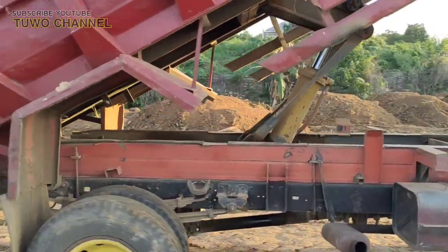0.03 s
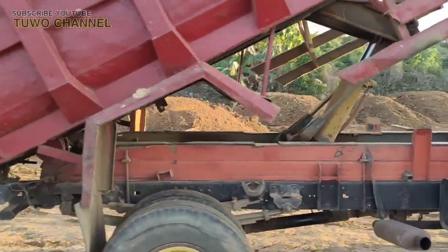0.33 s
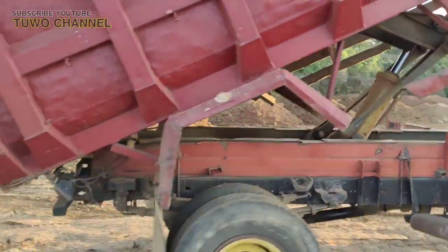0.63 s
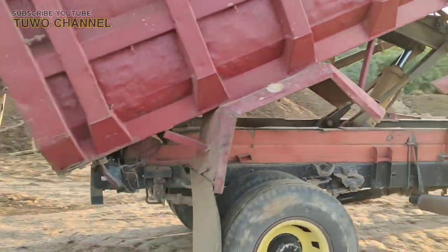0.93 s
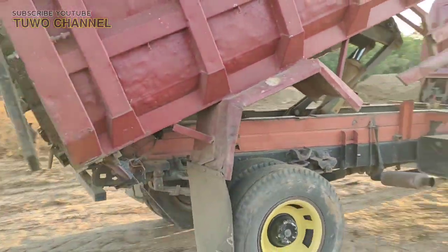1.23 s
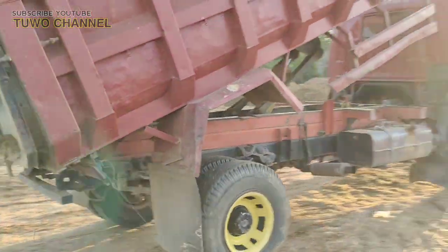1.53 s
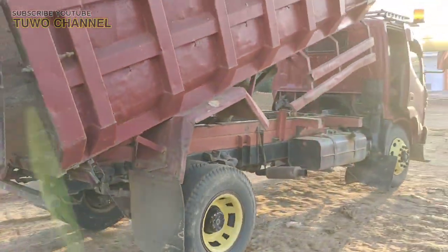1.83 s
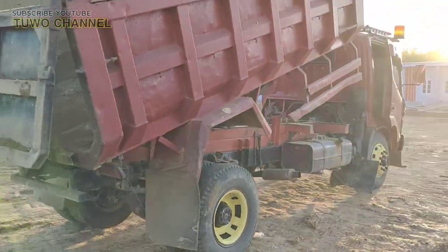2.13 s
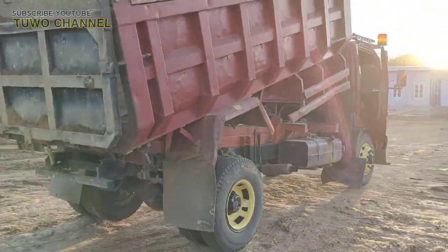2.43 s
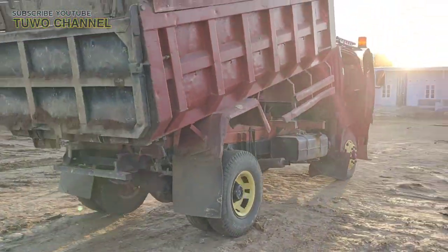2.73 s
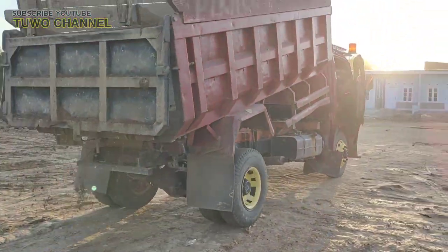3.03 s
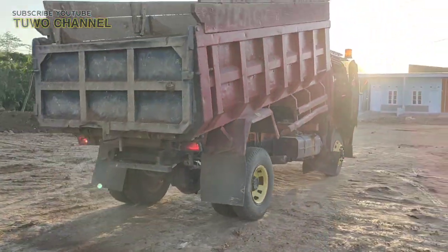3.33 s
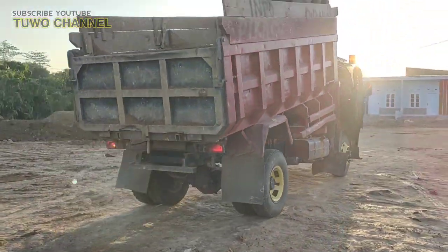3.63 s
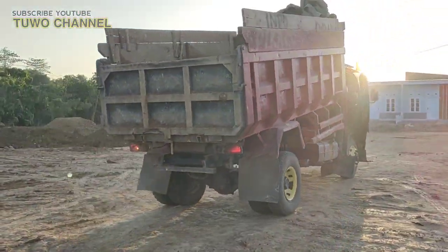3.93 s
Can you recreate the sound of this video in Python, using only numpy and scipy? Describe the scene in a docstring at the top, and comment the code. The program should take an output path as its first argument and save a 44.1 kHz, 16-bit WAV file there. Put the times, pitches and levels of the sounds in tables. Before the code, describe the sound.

A dump truck's diesel engine thuds a few metres away outdoors, slowing and receding from about 2 seconds. Its steel tailgate slams loudly at 0.1, 1.4 and 2.6 seconds, then more softly at 3.7, each time rattling and making the bed boom. A faint hydraulic whine sinks until 2.5 seconds. Sharp metal clanks follow between 2.5 and 3.7 seconds. Chassis knocks, brief squeaks and light scrapes are scattered throughout.

```python
"""Dump truck lowering its bed

A diesel truck pulls away over a dirt lot as its steel bed comes down with a hydraulic whine. The engine
thuds, slows and recedes. The swinging tailgate slams four times and makes the bed boom; its catches
clank, the chassis knocks and pivots squeak. Taken in the open from a few metres, on a closely spaced
pair of microphones that overload on the slams."""
import sys
import numpy as np
from scipy import signal
from scipy.fft import rfft, irfft, next_fast_len
from scipy.io import wavfile
from scipy.ndimage import map_coordinates

SR = 44100
rng = np.random.default_rng(int(sys.argv[2]) if len(sys.argv) > 2 else 0)


def to_wav(sig):
    """Store sig (one row per channel, or 1-D mono) as 16-bit WAV at the path in sys.argv[1].

    Samples outside -1..1 are clipped; the rate is SR.
    """
    pcm = np.clip(np.atleast_2d(sig), -1, 1) * 32767
    pcm = np.round(pcm).astype(np.int16)
    wavfile.write(sys.argv[1], SR, pcm.T)  # frames by channels


N = 176400

# tailgate slams: t/s, boom/dB, clash/dB, treble/dB, boom delay/s, stretch of chatter and boom/ratio
SLAMS = [(.093, -4, -10, -22, 0.027, 0.86), (1.425, -4, -10, -29.5, .018, 0.93),
         (2.636, -5, -8.5, -24.5, .018, 1.3), (3.674, -10.5, -22, -46, 0.0053, 0.81)]
# the gate's landing and rebounds: t after the slam/s (before stretch), level/dB
CHATTER = [(0, 7), (0.028, -5.5), (.06, -9.5), (0.111, -5.5)]
# spectra of the gate's first contact, its clash and the bed's boom: f/Hz, level/dB
IMPACT_SPECTRUM = [(300, -25), (900, -2), (1700, -9), (2600, -10), (3800, 6), (4900, 2), (5800, -38),
                   (7500, -19), (9000, -8), (15000, -21)]
CLASH_SPECTRUM = [(100, -47), (300, 10.5), (600, -4.5), (850, 9.5), (1350, 1.5), (1700, 3), (2100, -3.5),
                  (2600, -1), (3100, -11.5), (4300, -9.5), (5600, -43), (9000, -64)]
BOOM_SPECTRUM = [(25, -57), (60, -11), (100, 1.5), (135, 4.5), (230, 0.5), (340, 10), (430, -7.5),
                 (590, -10), (800, -5), (1100, -6), (1500, -56), (3000, -52.5)]
# decay of the boom: f/Hz, t60/s (before stretch)
BOOM_DECAY = [(100, 1), (220, 1), (350, 0.53), (800, 0.54), (2000, 0.16)]
# modes of the bed panels: f/Hz, level/dB, t60/s
PANEL_MODES = [(130.4, 4, 0.4), (202.8, -2, 1), (233.5, -2, 1), (303.7, -5.5, 0.33), (345.4, -2.5, 1),
               (530.4, -11, 0.59), (766, -11.5, 0.5), (820, 0, 0.46), (875, 0, 0.13), (898, -19, 0.47),
               (1100, -4.5, 0.39), (1212, -11, 0.53), (1607, 1, 0.22), (1802, -12, .35)]
# dull bumps of the bed: t/s, level/dB, f/Hz, t60/s
BED_BUMPS = [(0.0, -5, 240.4, 0.39), (.124, -24, 850, 0.16), (.134, -7.5, 517, 0.28),
             (0.847, -17.5, 350, 0.085), (1.254, -8.5, 365, 0.14), (1.281, -14.5, 382, 0.37),
             (1.551, -6.5, 190, 0.32), (2.484, -16.5, 460, 0.38), (2.791, -7, 224, 0.43),
             (3.66, -17, 385, 0.18), (3.681, -8, 383, 0.16), (3.798, -10, 209, 0.22)]
# clanks of the catches, with the gate's rebound at 2.743 s voiced the same way: t/s, crack/dB, treble/dB,
# ring/dB
CLANKS = [(2.483, -8, -19.5, -53), (2.692, -12.5, -17, -32.5), (2.743, -12, -27, -28),
          (3.053, -2, -8, -24.5), (3.723, -5, -7.5, -23)]
# a catch's crack and its ringing modes: f/Hz, level/dB
CRACK_SPECTRUM = [(200, -32), (500, -3.5), (900, 15), (1250, 2), (1700, -2), (2500, 4), (3000, 2.5),
                  (3500, -1.5), (4100, -8.5), (4900, -9.5), (5800, -22), (9000, -35)]
CATCH_MODES = [(2143, -7), (2476, -2), (2700, 0.5), (3068, -6), (4390, -2), (4511, -4), (6222, -7.5),
               (7654, 3.5), (8053, -8), (9608, -6), (10970, -15.5), (12240, -16), (14100, -19), (14340, -8)]
# engine speed: t/s, firing rate/Hz
FIRING_RATE = [(0, 30.63), (1.1, 30.63), (1.6, 30.4), (2.0, 29.3), (2.15, 24.5), (2.5, 24), (3.0, 26.4),
               (4, 26.5)]
# engine loudness as the truck moves off: t/s, exhaust/dB, clatter/dB, hiss/dB
ENGINE_LEVELS = [(0, -16.5, -19, -31.5), (.35, -15.5, -22.5, -33), (.7, -19, -24, -34.5),
                 (1.08, -17, -24, -33.5), (1.25, -19.5, -25, -39.5), (1.7, -21, -24.5, -36.5),
                 (2.0, -25, -27, -40.5), (2.25, -27.5, -27.5, -42), (2.5, -29.5, -34.5, -42),
                 (3.0, -27.5, -32, -42.5), (3.4, -33.5, -32.5, -44.5), (3.6, -32.5, -33.5, -45.5),
                 (4, -26.5, -34.5, -50)]
# engine spectra, the hiss also serving for steel and grit: f/Hz, level/dB
EXHAUST_SPECTRUM = [(20, -36), (40, -41), (60, -12), (90, -3), (122, 5.5), (155, 2), (210, -16),
                    (300, -15.5), (420, -36), (800, -45), (2000, -73)]
RUMBLE_SPECTRUM = [(20, -30), (40, -42), (70, -2), (120, -1), (200, -2.5), (370, -6.5), (520, -14),
                   (1000, -44), (3000, -80)]
CLATTER_SPECTRUM = [(150, -12), (400, -4), (600, -5), (950, 3), (1400, 0), (1700, 0), (2400, -4.5),
                    (3000, -8), (4000, -14.5), (5200, -24.5), (9000, -27.5)]
HISS_SPECTRUM = [(2000, 1.5), (4000, -2), (5700, -4.5), (7500, 3.5), (8600, -6.5), (11500, -13),
                 (14500, -17), (16000, -31)]
# chassis knocks: t/s, thud/dB, tick/dB
KNOCKS = [(0.262, -19, -5), (0.33, -9.5, -14), (.36, -34, -14), (0.393, -12, -3.5), (.523, -31, -16),
          (.653, -10.5, -10), (0.755, -20, -13), (0.785, -22, -22), (1.015, -25, -25), (1.896, -14, -32),
          (1.996, -12, -35), (3.247, -33, -22), (3.289, -12.5, -13.5), (3.445, -22, -24.5),
          (3.503, -18, -42), (3.554, -30, -40), (3.612, -29, -26), (3.909, -13, -12)]
# the low and high parts of a knock: f/Hz, level/dB
THUD_SPECTRUM = [(20, -36), (50, -17), (90, 6), (130, -3), (220, -11.5), (500, -27.5), (2000, -70)]
TICK_SPECTRUM = [(500, -12), (1600, -4.5), (2000, 0.5), (2300, 14.5), (2700, -14), (3600, -7), (6000, -40)]
# pivot squeaks: t/s, length/s, f/Hz, level/dB
SQUEAKS = [(.49, 0.073, 1690, -26), (.52, 0.095, 1920, -26.5), (.61, 0.03, 3370, -25.5),
           (0.991, .045, 1680, -25), (1.42, 0.034, 4860, -26), (1.5, .03, 4900, -27.5),
           (1.578, 0.03, 3396, -26.5), (2.05, 0.039, 5250, -39), (2.335, 0.039, 3490, -31.5),
           (2.985, 0.082, 2280, -24.5), (2.985, 0.076, 6980, -37.5), (3.15, 0.047, 3280, -34)]
# gritty scrapes: t/s, length/s, level/dB
SCRAPES = [(1.723, 0.13, -36), (2.022, 0.073, -36.5), (2.176, 0.049, -32.5), (2.589, 0.12, -28.5),
           (2.977, 0.046, -32.5), (3.111, 0.064, -29), (3.209, 0.034, -36), (3.433, 0.067, -33.5),
           (3.771, 0.035, -37)]
# hydraulic whine: t/s, f/Hz, level/dB
WHINE = [(.3, 4600, -44), (.6, 4354, -41), (1.0, 3970, -41.5), (1.3, 3790, -40.5), (1.7, 3590, -48),
         (2.05, 3510, -40), (2.45, 3540, -41), (2.6, 3480, -71)]
# bearings from the microphones as the truck moves past: t/s, lead of the right microphone/ms
GATE_BEARING = [(0, 0.4), (4, 0.335)]
BED_BEARING = [(0, 0.24), (4, 0.13)]
ENGINE_BEARING = [(0, -0.074), (.9, -0.071), (1.8, 0.14), (4, 0.14)]
# likeness of the sound at the two microphones: f/Hz, coherence/ratio
MIC_COHERENCE = [(60, 0.97), (250, 1), (500, 0.93), (1000, 0.55), (4000, 0.28), (12000, 0.18)]
# mismatch of the pair: f/Hz, left minus right/dB
MIC_BALANCE = [(60, -1.0), (92, -1.5), (140, -1.0), (210, -1.5), (330, -0.5), (500, 3), (760, -7.5),
               (1160, 3.5), (1780, -1.5), (2710, 3.5), (4140, -3.5), (6320, 3), (9660, -3), (14800, 3.5)]

STEEL_PEAKS_DB = 3  # depth of the crowded resonances in struck steel
IMPACT_DB, IMPACT_T60, CLASH_T60 = -3.5, 0.037, 0.23  # level relative to the clash
PANEL_DB = -7  # relative to the boom
CRACK_T60, CRACK_TAIL_T60, CRACK_TAIL_DB = 0.071, 0.55, -13
CATCH_T60, CATCH_SEATS_S, CATCH_DAMP_S = .42, .09, .02
FIRING_OFFSET_S, FIRING_JITTER_S, FIRING_SCATTER_DB = 0.001095, 0.00056, 2.56
RUMBLE_DB, RATTLE_DB = -2.5, -10  # relative to the exhaust thumps and the clatter
RATTLE_HZ, RATTLE_SPREAD_OCT, RATTLE_T60, RATTLE_SCATTER_DB = 1576, .55, 0.065, 3
WHINE_WIDTH_HZ = 190
MIC_CEILING, MIC_TOP_HZ = 1, 15400


def tailgate():
    """Steel hits steel hard, then chatters as the gate rebounds."""
    out = np.zeros((2, N))
    for s, _, clash_db, treble_db, _, stretch in SLAMS:
        impact = steel(IMPACT_SPECTRUM) * decay(IMPACT_T60, attack_s=0.0014)
        add(out, s, amp(clash_db + IMPACT_DB) * impact)
        for after_s, db in CHATTER:
            clash = amp(clash_db) * steel(CLASH_SPECTRUM) * decay(CLASH_T60, attack_s=0.0019)
            treble = amp(treble_db) * noise(HISS_SPECTRUM) * decay(t60=0.24, attack_s=0.00082)
            add(out, s + after_s * stretch, amp(db) * (clash + treble))
    return out


def bed_boom():
    """The empty bed booms and its panels ring just after each slam."""
    out = np.zeros((2, N))
    for s, boom_db, _, _, delay_s, stretch in SLAMS:
        boom = wash(BOOM_SPECTRUM, [(hz, t60 * stretch) for hz, t60 in BOOM_DECAY], attack_s=0.016)
        panels = amp(PANEL_DB) * ring(PANEL_MODES, attack_s=0.0017, drift_rad=0.52)
        add(out, s + delay_s, amp(boom_db) * (boom + panels))
    return out


def catches():
    """A hard crack, a short wash from the gate and a high steel ring, choked as the catch seats."""
    out = np.zeros((2, N))
    modes = [(hz, db, CATCH_T60) for hz, db in CATCH_MODES]
    choke = np.exp(-np.maximum(0, np.arange(SR) / SR - CATCH_SEATS_S) / CATCH_DAMP_S)
    tail = amp(CRACK_TAIL_DB) * decay(CRACK_TAIL_T60, attack_s=0.0016)
    for s, crack_db, treble_db, ring_db in CLANKS:
        crack = amp(crack_db) * steel(CRACK_SPECTRUM) * (decay(CRACK_T60, attack_s=0.00051) + tail)
        snap = noise(HISS_SPECTRUM) * decay(t60=0.052, attack_s=0.00029)
        shimmer = amp(-14) * noise(HISS_SPECTRUM, peaks_db=8) * decay(t60=.45, attack_s=.003)
        ringing = amp(ring_db) * ring(modes, attack_s=0.00071, drift_rad=0.87)
        add(out, s, crack + amp(treble_db) * (snap + choke * shimmer) + choke * ringing)
    return out


def bed_bumps():
    """The bed shifts on its frame and rings dully."""
    out = np.zeros((2, N))
    for s, db, hz, t60 in BED_BUMPS:
        body = [(hz / 5, -40), (hz * 0.71, -12), (hz, 0), (hz * 1.174, -14),
                (hz * 1.43, -17), (hz * 8, -42), (hz * 20, -70)]
        add(out, s, amp(db) * noise(body) * decay(t60, attack_s=0.0017))
    return out


def engine():
    """Each firing thumps the exhaust and drives clatter, hiss, rattle and whine, over a low rumble."""
    rate, = curves(FIRING_RATE)
    exhaust_db, clatter_db, hiss_db = curves(ENGINE_LEVELS)
    count = np.cumsum(rate) / SR
    times = np.interp(np.arange(int(count[-1])), count, np.arange(N) / SR) + FIRING_OFFSET_S
    kicks = np.zeros((1, N))
    for s, (late, size) in zip(times, rng.standard_normal((len(times), 2))):
        add(kicks, s + FIRING_JITTER_S * late, amp([FIRING_SCATTER_DB * size]))
    each_firing = lambda shape: unit(signal.fftconvolve(kicks[0], shape)[:N])
    thumps = each_firing(pulse(EXHAUST_SPECTRUM))
    rumble = amp(RUMBLE_DB + 1.3 * wobble(13)) * noise(RUMBLE_SPECTRUM, size=N)
    bursts = each_firing(decay(t60=0.18, attack_s=0.0025))
    clatter_envelope = unit((1.5 + bursts) * amp(2 * wobble(170) + 1.1 * wobble(8)))
    clatter = clatter_envelope * noise(CLATTER_SPECTRUM, size=N, peaks_db=2)
    hiss_envelope = unit((3 + bursts) * amp(1.3 * wobble(200) + 1.7 * wobble(14)))
    hiss = hiss_envelope * noise(HISS_SPECTRUM, size=N)
    clatter += rattle(times)
    whine = hydraulics(each_firing(decay(t60=.05, attack_s=0.0016)))
    return amp(exhaust_db) * (thumps + rumble) + amp(clatter_db) * clatter + amp(hiss_db) * hiss + whine


def chassis():
    """Slack joints knock, dry pivots squeak and grit scrapes."""
    out = np.zeros((2, N))
    for s, thud_db, tick_db in KNOCKS:
        add(out, s, amp(thud_db) * pulse(THUD_SPECTRUM))
        add(out, s, amp(tick_db) * steel(TICK_SPECTRUM) * decay(t60=0.038, attack_s=0.0021))
    for s, length_s, hz, db in SQUEAKS:
        shape = swell(length_s)
        pitch = hz * (1 + 0.013 * wobble(511.7, size=len(shape)))
        add(out, s, amp(db) * shape * unit(np.sin(2 * np.pi * np.cumsum(pitch) / SR)))
    for s, length_s, db in SCRAPES:
        shape = swell(length_s)
        grit = noise(HISS_SPECTRUM) * amp(0.94 * wobble(400, size=SR))
        add(out, s, amp(db) * shape * grit[:, :len(shape)])
    return out


def rattle(firing_times):
    """Loose fittings clink four times after each firing."""
    out, t = np.zeros((2, N)), np.arange(SR // 8) / SR
    shape = decay(RATTLE_T60, attack_s=0.0012)[:len(t)]
    for s in np.repeat(firing_times, 4):
        pitch, size, late, apart = rng.standard_normal(4)
        hz = RATTLE_HZ * 2 ** (RATTLE_SPREAD_OCT * pitch)
        clink = shape * np.sin(2 * np.pi * hz * t + apart * np.array([[.5], [-.5]]))
        add(out, s + 0.015 * abs(late), amp(RATTLE_DB + RATTLE_SCATTER_DB * min(size, 2)) * clink)
    return out


def hydraulics(bursts):
    """A narrow, sinking whine of oil that pulses with the engine."""
    hz, db = curves(WHINE)
    band = np.array([wobble(WHINE_WIDTH_HZ * 2) + 1j * wobble(WHINE_WIDTH_HZ * 2) for _ in range(2)])
    whine = np.real(band * np.exp(2j * np.pi * np.cumsum(hz) / SR))
    return amp(db + 3.4 * wobble(22)) * unit((1.6 + bursts) * whine)


def wash(spectrum, t60s, attack_s):
    """Crowded plate modes: noise whose bands die at their own speeds."""
    plate, centres = steel(spectrum), [hz for hz, _ in t60s]
    out = np.zeros((2, SR))
    for weights, (_, t60) in zip(np.eye(len(centres)), t60s):
        band = filtered(plate, lambda hz: along(list(zip(centres, weights)), hz))
        out += band * decay(t60, attack_s)
    return out


def ring(modes, attack_s, drift_rad):
    """Single modes, a little different at every blow and at each microphone."""
    t, out = np.arange(SR) / SR, np.zeros((2, SR))
    for hz, db, t60 in modes:
        apart = stereo_angle(hz) * rng.normal(size=(2, 1))
        phase = 2 * np.pi * (hz * t + rng.random())
        phase += drift_rad * np.interp(t, np.linspace(0, 1, 40), rng.standard_normal(40))
        out += amp(db + rng.normal(0, 2.7)) * decay(t60, attack_s) * np.sin(phase + apart)
    return out


def steel(spectrum):
    """One second of noise with the crowded resonances of struck steel."""
    return noise(spectrum, peaks_db=STEEL_PEAKS_DB)


def noise(spectrum, size=SR, peaks_db=0):
    """Coloured stereo noise of rms 1, wider toward the treble; peaks_db adds narrow resonances."""
    def response(hz):
        peaks = peaks_db * np.interp(np.sqrt(hz), np.linspace(0, 150, 300), rng.standard_normal(300))
        angle = stereo_angle(hz)
        return amp(along(spectrum, hz) + peaks) * [np.cos(angle), np.sin(angle)]
    mid, side = filtered(rng.standard_normal((2, size)), response)
    return unit(np.array([mid + side, mid - side]))


def pulse(spectrum, size=8192):
    """A minimum-phase pulse of peak 1 with the given spectrum."""
    cepstrum = irfft(np.log(amp(along(spectrum, np.fft.rfftfreq(size, 1 / SR)))))
    cepstrum[1:size // 2] *= 2
    cepstrum[size // 2 + 1:] = 0
    wave = irfft(np.exp(rfft(cepstrum)))
    return wave / np.abs(wave).max()


def decay(t60, attack_s):
    """One second of a struck envelope, falling 60 dB in t60 seconds."""
    t = np.arange(SR) / SR
    return np.exp(-np.log(1000) * t / t60) * (1 - np.exp(-t / attack_s))


def swell(length_s):
    """A smooth rise and fall."""
    return signal.windows.tukey(int(length_s * SR), .7)


def wobble(rate, size=N):
    """A smooth random curve, rate knots a second."""
    return map_coordinates(rng.standard_normal(4096), [np.arange(size) * rate / SR], mode="wrap")


def amp(db):
    """Decibels to gain."""
    return 10 ** (np.asarray(db) / 20)


def unit(x):
    """Scale to rms 1."""
    return x / np.sqrt(np.mean(x ** 2) + 1e-20)


def along(points, hz):
    """Interpolate (f/Hz, value) points on a log frequency axis."""
    freqs, values = np.transpose(points)
    return np.interp(np.log(hz + 1), np.log(freqs + 1), values)


def curves(rows):
    """One value per sample for each column after the time."""
    times, *columns = np.transpose(rows)
    return [np.interp(np.arange(N) / SR, times, column) for column in columns]


def filtered(x, response):
    """Filter x by a gain that depends on frequency."""
    size = x.shape[-1]
    padded = next_fast_len(size + 4096)
    return irfft(rfft(x, padded) * response(np.fft.rfftfreq(padded, 1 / SR)), padded)[..., :size]


def add(track, s, x):
    """Mix x into the track at time s."""
    start = max(0, round(s * SR))
    track[:, start:start + x.shape[-1]] += x[..., :N - start]


def stereo_angle(hz):
    """Mid-side angle in radians: zero where both microphones hear the same."""
    return np.arccos(np.clip(along(MIC_COHERENCE, hz), 0, 1)) / 2


def placed(x, bearing):
    """The sound reaches one microphone before the other."""
    lead_ms, = curves(bearing)
    shift = lead_ms * SR / 1000 / 2
    return np.array([map_coordinates(side, [np.arange(N) + sign * shift], order=3)
                     for side, sign in zip(x, (-1, 1))])


def scene():
    """From a few metres off, engine and chassis, bed and tailgate each have their own bearing."""
    truck = placed(engine() + chassis(), ENGINE_BEARING)
    bed = placed(bed_boom() + bed_bumps(), BED_BEARING)
    gate = placed(tailgate() + catches(), GATE_BEARING)
    return truck + bed + gate


def record(dry):
    """Two slightly unlike microphones overload softly on the peaks and lose the top of the treble."""
    pair = filtered(dry, lambda hz: amp(along(MIC_BALANCE, hz) * np.array([[.5], [-.5]])))
    overloaded = pair / (1 + np.abs(pair / MIC_CEILING) ** 6) ** (1 / 6)
    return filtered(overloaded, lambda hz: hz < MIC_TOP_HZ)


dry = scene()
out = record(dry)
to_wav(out)
```